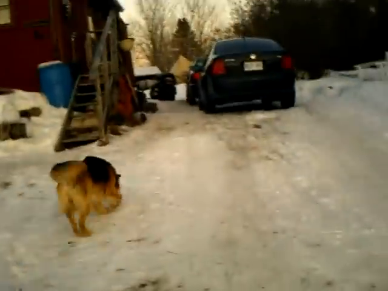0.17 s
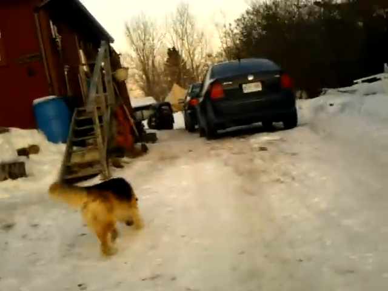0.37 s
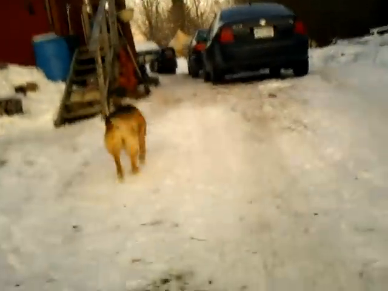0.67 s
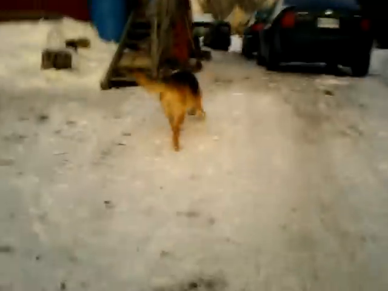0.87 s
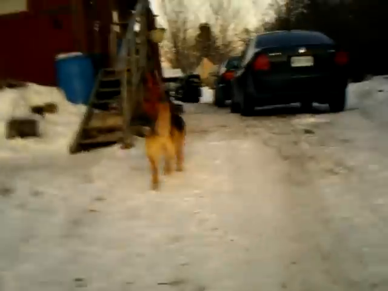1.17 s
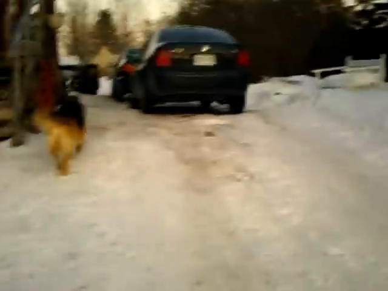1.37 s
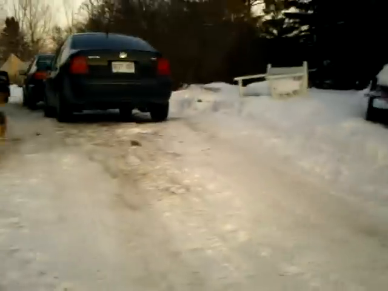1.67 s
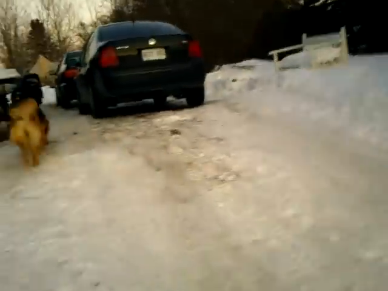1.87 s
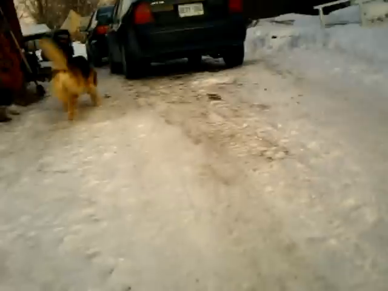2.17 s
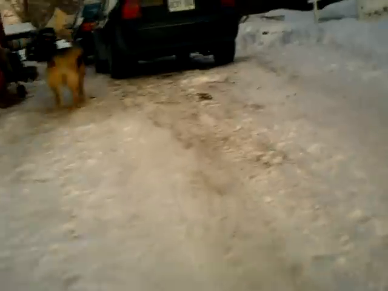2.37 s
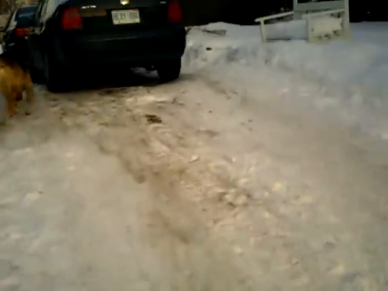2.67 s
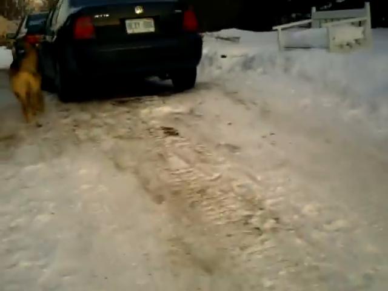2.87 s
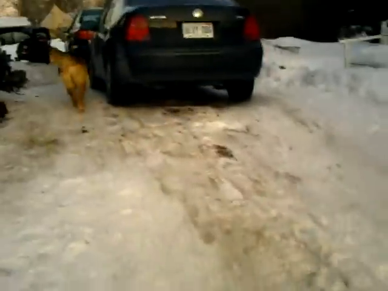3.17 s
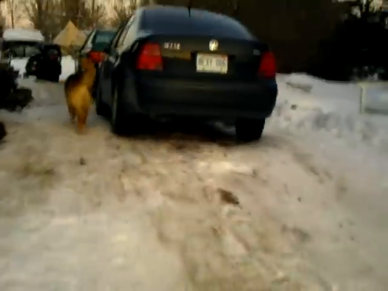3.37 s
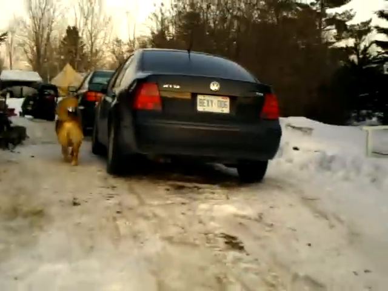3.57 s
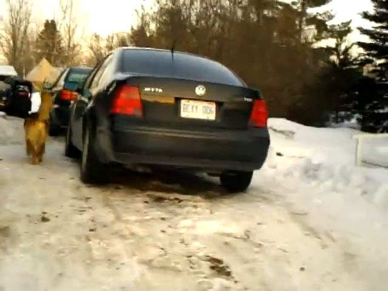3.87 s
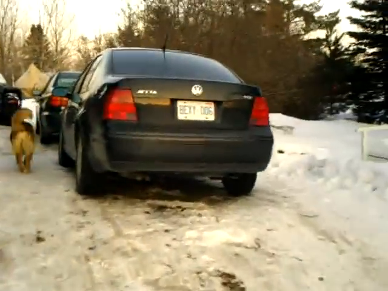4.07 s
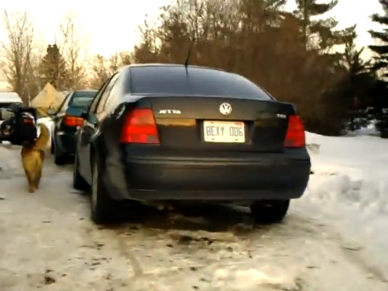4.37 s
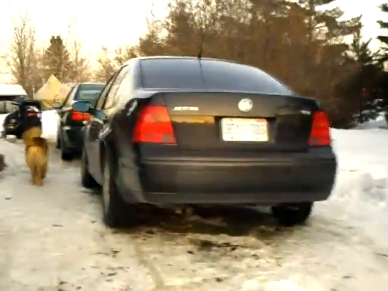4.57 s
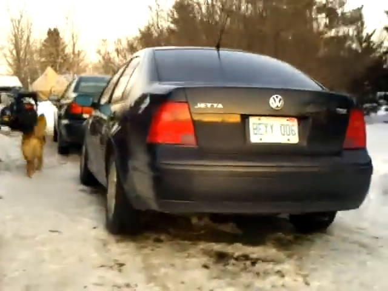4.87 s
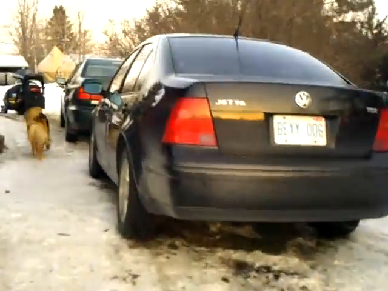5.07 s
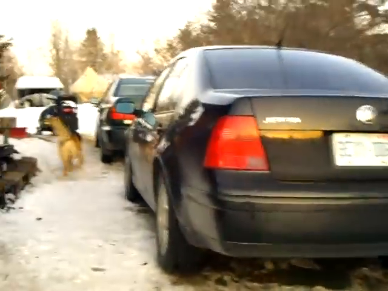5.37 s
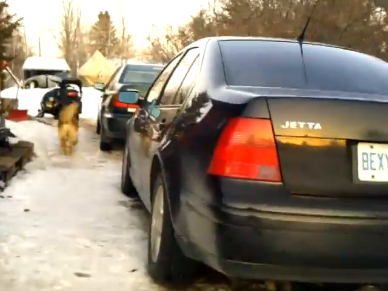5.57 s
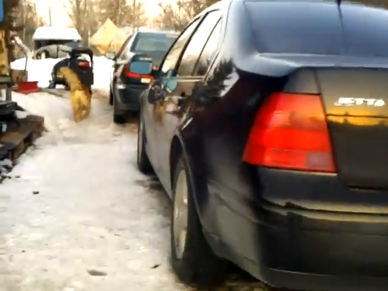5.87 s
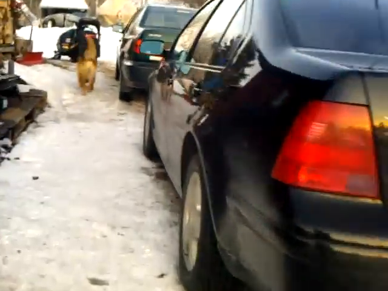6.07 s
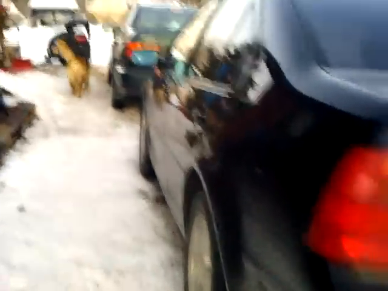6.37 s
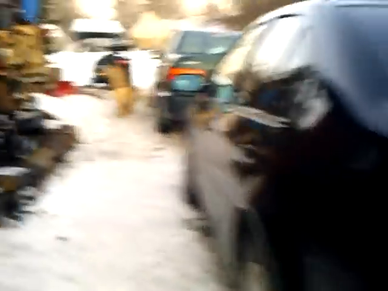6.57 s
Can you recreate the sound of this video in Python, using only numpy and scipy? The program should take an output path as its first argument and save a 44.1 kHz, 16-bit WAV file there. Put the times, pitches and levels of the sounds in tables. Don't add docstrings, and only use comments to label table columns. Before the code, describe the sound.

Hard plasticky handling scrapes, clicks and bumps fade after three seconds, leaving dull, brittle footsteps on packed icy snow beneath faint hiss.

```python
import sys
import numpy as np
from scipy import signal
from scipy.fft import rfft, irfft
from scipy.io import wavfile
from scipy.ndimage import uniform_filter1d

SR = 44100
rng = np.random.default_rng(int(sys.argv[2]) if len(sys.argv) > 2 else 0)


def wav_out(sig):
    wavfile.write(sys.argv[1], SR, np.round(np.clip(np.atleast_2d(sig).T, -1, 1) * 32767).astype(np.int16))


def amplitude_ratio(level_db):
    exponent = np.asarray(level_db, float) / 20
    return 10 ** exponent


N = 295766
TIME = np.arange(N) / SR


def level(x):
    return x / np.sqrt(np.mean(x ** 2))


def ring(x, modes):
    out = 0
    for hz, width, db in modes:
        b, a = signal.iirpeak(hz, hz / (1.36 * width), fs=SR)
        once = signal.lfilter(b, a, x)
        out = out + amplitude_ratio(db) * signal.lfilter(b, a, once)
    return out


def colour(x, points):
    hz, db = np.transpose(points)
    grid = np.maximum(np.fft.rfftfreq(4096, 1 / SR), 1)
    log_gain = np.interp(np.log(grid), np.log(hz), db) * np.log(10) / 20
    cep = irfft(log_gain)
    cep[1:2048] *= 2
    cep[2049:] = 0
    response = irfft(np.exp(rfft(cep)))
    return signal.fftconvolve(x, response)[:len(x)]


def walk(rate):
    hold = int(SR / rate)
    steps = np.repeat(rng.standard_normal(N // hold + 1), hold)
    return 0.99 * uniform_filter1d(steps, hold)[:N]


def grains(rate, spread_db, patchy_db, smooth_db):
    chance = rng.random((3, N))
    size_db = np.minimum(-spread_db * np.log(chance[1] + 1e-9), 13)
    size = amplitude_ratio(size_db) * np.sign(chance[2] - .5)
    breaks = level((chance[0] < rate / SR) * size)
    patches = amplitude_ratio(patchy_db * (walk(50) + walk(160)))
    return level(patches * (breaks + amplitude_ratio(smooth_db) * rng.standard_normal(N)))


def hits(table, voices, burst_s):
    size = 2048
    out = np.zeros(N + size)
    t = np.arange(size) / SR
    for s, *dbs in table:
        burst = rng.standard_normal(size) * t * np.exp(-2 * t / burst_s)
        start = int(s * SR)
        for column, voice, trim_db in voices:
            y = voice(burst)
            out[start:start + size] += amplitude_ratio(dbs[column] + trim_db) * y / np.abs(y).max()
    return out[:N]


def strokes(table, rise_db_per_s, fall_db_per_s):
    t = TIME[::64]
    s, length, start_db, end_db, tint_db = np.array(table, float).T[:, :, None]
    along = np.clip((t - s) / np.maximum(length, 1e-3), 0, 1)
    db = start_db + (end_db - start_db) * along
    db = db - rise_db_per_s * np.maximum(s - t, 0) - fall_db_per_s * np.maximum(t - s - length, 0)
    power = amplitude_ratio(db) ** 2 + 1e-14
    total = power.sum(axis=0)
    tint = (power * tint_db).sum(axis=0) / total
    return np.interp(TIME, t, 10 * np.log10(total)), np.interp(TIME, t, tint)


# frequency in Hz, level in dB per Hz.
HISS = [(24, -30), (40, -5), (154, -14), (627, -11.5), (2140, -14), (2810, -10.5), (3520, -19), (3990, -18),
        (5260, -22.5), (7100, -23.5), (7650, -16.5), (8240, -22.5), (15800, -24)]
# multiple of the whine frequency, level in dB rms.
WHINE = [(1, -69.5), (2, -70.5), (4, -83)]
WRITES = [0.07, 4.067, 4.123, 4.233, 4.329, 4.499, 4.599, 4.764, 4.898, 5.037, 5.197, 5.269, 5.437, 5.573,
          5.705, 5.866, 5.939, 6.042, 6.14, 6.24, 6.377, 6.474, 6.574]


def camera():
    hiss_db = -60.5 + .5 * walk(3.3)
    out = amplitude_ratio(hiss_db) * level(colour(rng.standard_normal(N), HISS))
    whine_hz, frame_hz = 3867.2, 29.355
    frame_time = TIME % (1 / frame_hz)
    for multiple, db in WHINE:
        out += np.sqrt(2) * amplitude_ratio(db) * np.sin(2 * np.pi * multiple * whine_hz * frame_time)
    first_write_s, write_every_s = 3.185, .1013
    s = np.append(first_write_s + write_every_s * np.arange(9), WRITES)
    side, size, depth = rng.random((len(s), 3)).T
    db = -42.5 + 1.6 * (2 * depth - 1)
    twin_s = s + .003 * np.sign(side - .6)
    writes = np.zeros(N)
    writes[(s * SR).astype(int)] = amplitude_ratio(db)
    writes[(twin_s * SR).astype(int)] = amplitude_ratio(db) * (0.21 + 0.3 * size)
    t = np.arange(-600, 601) / SR
    dip = 0.85 * np.exp(-(t / 0.00064) ** 4) + 0.21 * np.exp(-(t / 0.002) ** 2)
    dip -= 0.14 * np.exp(-((t - .008) / 0.0055) ** 2)
    return out - signal.fftconvolve(writes, dip, "same")


# start in seconds, length in seconds,
# start level in dB, end level in dB, flutter in dB relative to the swing.
SWINGS = [(0, 0.16, -39.5, -54, -16), (.25, 0.225, -40.5, -53.5, 3.5), (.5, 0.27, -55, -55, -5),
          (.78, .5, -41.5, -48, -5.5), (1.43, 0.067, -27.5, -32.5, -16.5), (1.5, 0.19, -34, -39.5, -9.5),
          (1.75, 0.41, -31.5, -37, -9.5), (2.1, 0.35, -39, -33.5, -12), (.655, 0.018, -51, -43, 3),
          (2.12, .07, -42, -39, 5), (2.58, 0.086, -36, -40, -21), (2.78, 4.1, -59.5, -63, -7),
          (4.93, .15, -51, -59.5, -15), (6.0, 0.23, -59, -54.5, -9.5)]


def buffet():
    swing_db, flutter_db = strokes(SWINGS, rise_db_per_s=151.5, fall_db_per_s=151.5)
    swing_outline = [(2, -21.0), (9, 11.5), (22, -5.5), (45, -23.0), (150, -59)]  # (Hz, dB)
    flutter_outline = [(20, -25.0), (45, 3.0), (100, -8.0), (200, -21.5), (500, -54)]
    swing = level(colour(rng.standard_normal(N), swing_outline))
    flutter = level(colour(rng.standard_normal(N), flutter_outline))
    return amplitude_ratio(swing_db) * (swing + amplitude_ratio(flutter_db - 3.5) * flutter)


# start in seconds, length in seconds, start level in dB,
# end level in dB, fine ice in dB relative to the crunch.
STEPS = [(3.685, 0.062, -55, -58, -2.5), (3.8, 0.1, -61, -62.5, 6), (3.96, 0.17, -55, -61.5, -4),
         (4.25, 0.15, -52.5, -60, -16), (4.52, 0.091, -59.5, -57, -6.5), (4.66, .1, -58, -60.5, -2.5),
         (4.795, 0.031, -57, -54, 19), (4.83, .045, -48.5, -49, -6.5), (4.89, 0.078, -52, -54.5, 3),
         (5.08, 0.21, -55, -58.5, -5), (5.4, 0.11, -58, -58, 0), (5.635, 0.042, -58, -53, -8),
         (5.7, 0.2, -57.5, -64.5, -4), (5.97, 0.026, -63, -60.5, -1), (6.05, 0.12, -63, -65, 0),
         (6.23, 0.079, -53.5, -51.5, -12.5), (6.34, .05, -56.5, -58, -8.5), (6.42, 0.093, -57, -63.5, -4),
         (6.58, 0.14, -52.5, -59, -6.5)]
# time in seconds, peak in dB, body in dB.
CRACKS = [(3.1275, -23, -23.5), (3.7144, -42, -49), (4.0397, -40, -65), (4.0683, -51, -45.5),
          (4.1052, -33.5, -54), (4.1169, -38, -44.5), (4.1456, -33.5, -51), (4.1905, -38.5, -44),
          (4.2049, -41, -46), (4.2445, -44, -52), (4.2597, -32.5, -50), (4.2811, -32.5, -55),
          (4.3481, -41, -42), (4.5892, -40, -48), (4.6455, -37, -22.5), (4.6852, -31, -51),
          (4.8058, -31, -45), (5.0942, -43, -48), (5.1066, -39.5, -48), (5.4199, -36, -53),
          (5.4935, -48, -41), (5.4977, -33.5, -48), (5.6028, -32, -35), (5.6268, -36, -45.5),
          (5.9141, -49, -41.5), (6.0075, -35.5, -28), (6.3238, -33.5, -50), (6.3797, -37, -34.5),
          (6.6393, -42, -37), (6.655, -46, -32)]
# frequency in Hz, width in Hz, level in dB.
CRUST = [(2160, 1070, 12.5), (2770, 675, 21.5), (3186, 350, -3)]
CRUST_BODY = [(465, 840, 1.5), (951, 450, 5), (1180, 430, 0)]
CRUST_FINE = [(3830, 170, -10), (5000, 1600, -6.5)]
CRUST_KNOCK = [(930, 460, -3.5), (1214, 295, 3)]


def boots():
    crunch_db, fine_db = strokes(STEPS, rise_db_per_s=247.5, fall_db_per_s=350)
    body_db = -5 - 0.17 * np.maximum(crunch_db + 63.5, -15)
    crumble = grains(rate=2000.0, spread_db=3.0, patchy_db=2.85, smooth_db=4.0)
    crackle = grains(rate=54.0, spread_db=1.5, patchy_db=1., smooth_db=-25.0)
    crumble = crumble + amplitude_ratio(-15) * crackle
    elsewhere = np.roll(crumble, N // 3)
    crunch = level(ring(crumble, CRUST))
    crunch += amplitude_ratio(body_db + 2.5 * walk(18)) * level(ring(elsewhere, CRUST_BODY))
    fine = amplitude_ratio(crunch_db + fine_db - 17.0) * level(ring(crumble, CRUST_FINE))

    ticks = grains(rate=35., spread_db=3.5, patchy_db=1., smooth_db=-40.)
    settling = level(ring(ticks, CRUST)) + 0.41 * level(ring(ticks, CRUST_KNOCK))
    settling *= amplitude_ratio(-68) * (TIME > STEPS[0][0])

    voices = [(0, lambda b: ring(b, CRUST), 2.5),  # (column, voice, trim dB)
              (1, lambda b: ring(b, CRUST_KNOCK), -1.5),
              (0, lambda b: ring(b, CRUST_FINE), -36)]
    cracks = hits(CRACKS, voices, burst_s=0.00027)
    far = signal.butter(3, 3620, fs=SR, output="sos")
    return signal.sosfilt(far, settling + crunch * amplitude_ratio(crunch_db + 1.5) + cracks) + fine


# frequency in Hz, level in dB per Hz.
CASE_LOW = [(600, -44), (900, -17.5), (1050, -4.5), (1200, 1), (1400, -0.5), (1500, -5), (1650, -15),
            (2500, -63.5)]
CASE_HIGH = [(1100, -48.5), (1650, -1), (2000, -0.5), (2500, -3.5), (2950, 1.5), (3400, 5), (3900, 0),
             (4150, -4.5), (4450, -18.5), (4900, -8.5), (5700, -19.5), (6700, -24.5), (9000, -34.5)]
TREBLE = [(5000, -47), (6500, 3), (7500, -7), (9200, 13.5), (11200, 8), (15800, -6.5)]
BASS = [(35, -7), (70, 2), (180, -2.5), (330, 1.5), (500, 6.5), (850, 1), (1100, -21), (2200, -74)]
# frequency in Hz, width in Hz, level in dB.
GRIPPED = [(1350, 170, 2.5), (3760, 424, 0.5)]


def case(drag, high_db, low_db, treble_db, bass_db):
    sound = level(colour(drag, CASE_HIGH))
    sound += amplitude_ratio(low_db) * level(colour(drag, CASE_LOW))
    sound += amplitude_ratio(treble_db) * level(colour(drag, TREBLE))
    sound += amplitude_ratio(bass_db) * level(colour(drag, BASS))
    grip_db = np.minimum(0.46 * (high_db + 16.5), 0.1)
    sound += amplitude_ratio(grip_db) * level(ring(drag, GRIPPED))
    return sound * amplitude_ratio(high_db)


# start in seconds, length in seconds, upper ring in dB,
# lower ring in dB relative to the upper, bass in dB relative to the upper.
SWIPES = [
    (0.19, 0.029, -24.5, 1, -32),
    (0.219, 0.019, -40.5, 10, -10),
    (0.313, 0.0078, -20, -7, -19),
    (0.324, 0.041, -20, -6, -12.5),
    (0.448, 0.039, -24.5, -10, -10),
    (0.475, 0.0097, -30, -2, -23),
]


def swipes():
    controls, gate = np.zeros((4, N)), np.zeros(N)
    treble_db = -27
    for s, length, high_db, low_db, bass_db in SWIPES:
        part = (TIME > s - .004) & (TIME < s + length + .004)
        controls[:, part] = np.array([high_db, low_db, treble_db, bass_db])[:, None]
        swell = np.clip((TIME - s + 0.005) / 0.027, 0, 1)
        stop = np.clip((s + length + 0.0036 - TIME) / 0.008, 0, 1)
        gate += swell * stop
    drag = grains(rate=1400.0, spread_db=4.5, patchy_db=2.5, smooth_db=-3.0)
    return gate * case(drag, *controls)


# time in seconds, peak in dB, lower ring in dB.
SLIPS = [(0.0431, -21.5, -52), (0.1617, -24, -38), (0.1877, -26, -16), (0.1986, -27, -11),
         (0.2054, -8, -29), (0.2265, -34, -22), (0.3076, -4.5, -9), (0.3365, -5, -14), (0.347, -11, -32),
         (0.3569, -1, -14), (.3752, -40, -30), (0.4461, -14, -45), (0.4643, -21, -19.5),
         (0.4684, -6.5, -17), (0.4797, -13, -32), (0.6634, -7.5, -11.5), (0.6698, -29, -9.5),
         (0.8643, -12, -16), (0.8768, -11, -12.5), (1.0932, -28, -16), (1.1415, -11, -14),
         (1.1712, -17.5, -16), (1.8501, -16, -8), (1.9766, -22, -36), (1.9955, -10, -17),
         (2.0234, -13, -17.5), (2.0771, -16, -40), (2.1624, -23, -33), (2.2215, -18, -19),
         (2.4437, -10, -21), (2.5307, -13.5, -34)]


def slips():
    voices = [(0, lambda b: colour(b, CASE_HIGH), -2.5),  # (column, voice, trim dB)
              (1, lambda b: colour(b, CASE_LOW), -3.0),
              (0, lambda b: colour(b, TREBLE), -34.5)]
    return hits(SLIPS, voices, burst_s=0.0013)


def thump(burst):
    t = np.arange(len(burst)) / SR
    return np.sin(2 * np.pi * 230 * t) * np.exp(-t / .003)


# time in seconds, thump in dB, hollow body in dB.
KNOCKS = [(.2265, -36.5, -40), (.3076, -4.5, -15.5), (.3365, -18.5, -30), (.347, -36, -32),
          (.3752, -24.5, -30), (.46, -40, -25.5), (.6634, -27.5, -22.5), (.8643, -29, -31),
          (1.836, -32, -21), (1.9955, -31, -26), (2.0234, -31, -30), (3.1275, -50, -35),
          (4.6455, -39.5, -42)]


def knocks():
    voices = [(0, thump, -0.28), (1, lambda b: colour(b, BASS), -0.083)]
    return hits(KNOCKS, voices, burst_s=0.0017)


# start in seconds, length in seconds, start level in dB,
# end level in dB, lower ring in dB relative to the upper.
DRAGS = [(0.0, .29, -52.5, -52.5, 1), (.162, 0.074, -40.5, -36.5, 2), (.37, 0.031, -42, -41.5, -1),
         (.43, 0.065, -45, -35, -6), (.5, 0.19, -42.5, -38, 3.5), (.66, .11, -26.5, -22, -6),
         (.79, 0.21, -28.5, -30.5, -1), (1.02, 0.17, -35, -28, 3), (1.19, 0.11, -31.5, -38, 1),
         (1.31, 0.205, -32, -33.5, 0.5), (1.47, 0.087, -32.5, -22, -4.5), (1.58, 0.17, -18, -23, -7.5),
         (1.73, 0.047, -18.5, -14.5, -3.5), (1.79, 0.098, -18.5, -20, -2.5),
         (1.905, 0.043, -32.5, -39.5, 0.5), (1.99, 0.073, -39.5, -27, -4), (2.1, 0.072, -28.5, -30.5, -2.5),
         (2.2, .19, -36, -39, -1.5), (2.44, 0.17, -26.5, -37, -3.5), (2.62, 0.35, -39, -33, -0.5),
         (2.96, .12, -34.5, -42.5, 0)]
BRUSHES = [
    (3.133, 0.071, -45, -41.5, -7),
    (3.224, 0.028, -44, -52.5, 1.5),
    (3.267, 0.047, -53, -50.5, 0.5),
    (3.363, 0.058, -55.5, -58.5, 3.5),
    (3.432, 0.059, -49.5, -50, -5),
    (3.553, 0.067, -49.5, -45.5, -1),
]
# frequency in Hz, width in Hz, level in dB.
PALM = [(1825, 620, 0)]
# frequency in Hz, width in Hz, level in dB.
NYLON = [(4950, 440, 0), (5700, 980, -3.8)]


def glove():
    db, low_db = strokes(DRAGS + BRUSHES, rise_db_per_s=504, fall_db_per_s=806)
    light = TIME > BRUSHES[0][0] - .04
    treble_db = np.where(light, -21.5, -27) + 0.27 * (db + 31.5)
    bass_db = np.where(light, -25, -15.5) - 0.34 * np.maximum(db + 28.5, -25) + 0.15 * low_db
    drag = grains(rate=2500., spread_db=2.0, patchy_db=1.3, smooth_db=1.5)
    # 2.5 dB, 12 times a second
    low, treble, bass, palm = (2.5 * walk(12) for _ in range(4))
    rub = case(drag, db, low_db + low / 2, treble_db + treble, bass_db + bass / 2)
    rub += amplitude_ratio(db - 15 + 2 * palm) * level(ring(drag, PALM))
    rub += light * amplitude_ratio(db - 13 - low_db / 2) * level(ring(drag, NYLON))
    return rub + swipes() + slips() + knocks()


def scene():
    return (camera() + buffet() + boots() + glove())[None]


def band_limit(x):
    return signal.sosfilt(signal.butter(12, 16230, fs=SR, output="sos"), x)


def record(dry):
    overload = np.tanh(1.089 * dry) / 1.124
    cut = signal.ellip(10, .1, 80, 15850, fs=SR, output="sos")
    return band_limit(signal.sosfilt(cut, overload))


dry = scene()
out = record(dry)
wav_out(out)
```